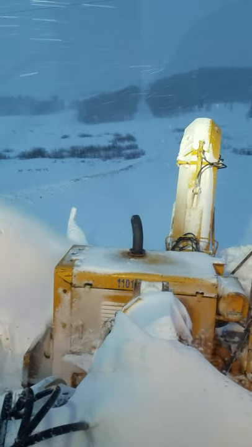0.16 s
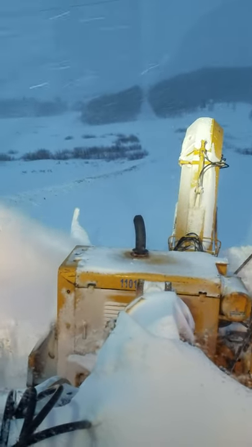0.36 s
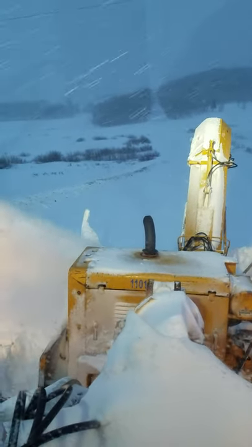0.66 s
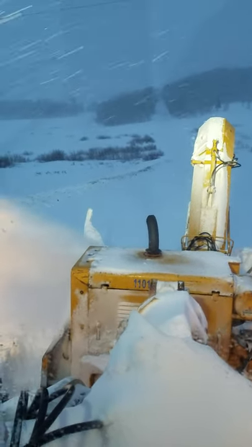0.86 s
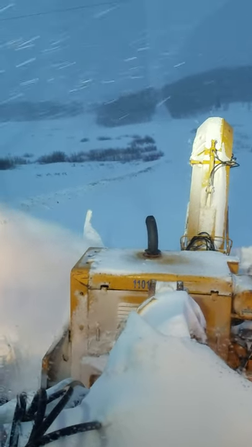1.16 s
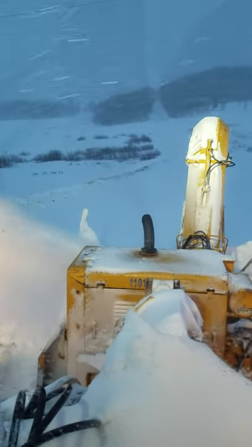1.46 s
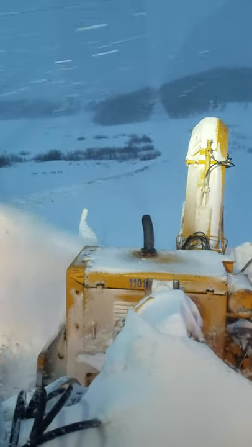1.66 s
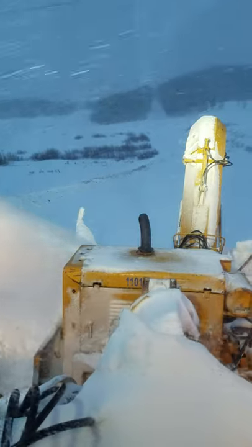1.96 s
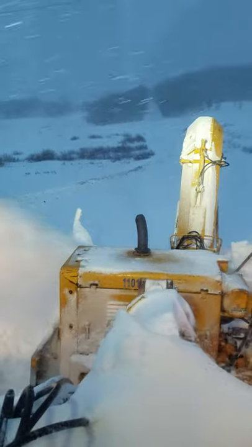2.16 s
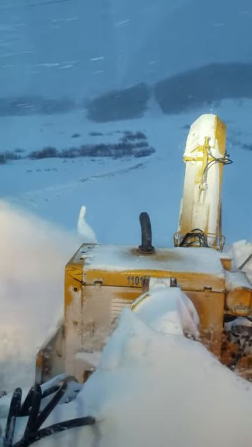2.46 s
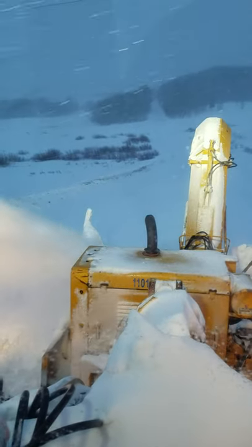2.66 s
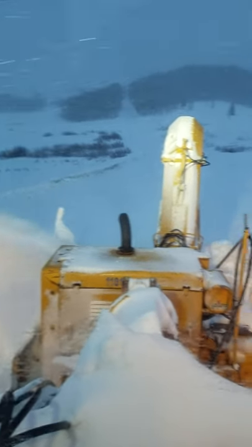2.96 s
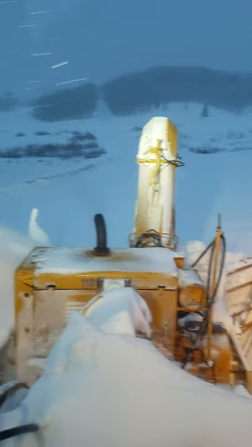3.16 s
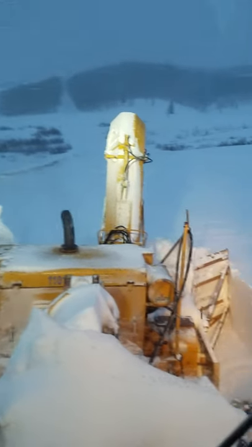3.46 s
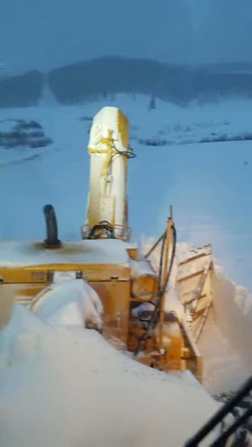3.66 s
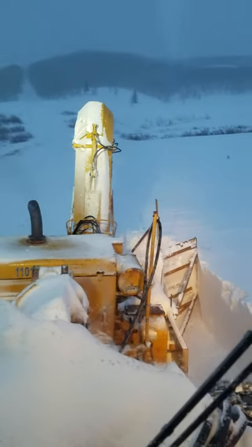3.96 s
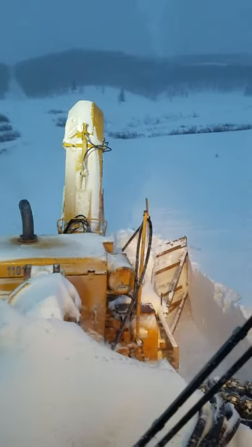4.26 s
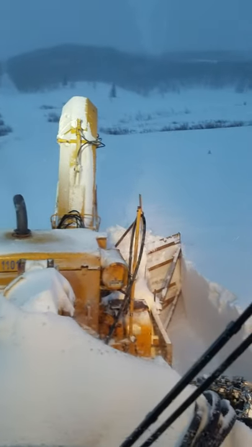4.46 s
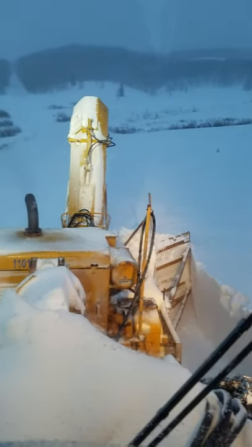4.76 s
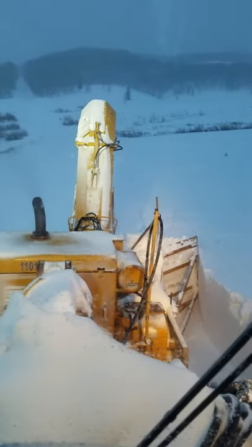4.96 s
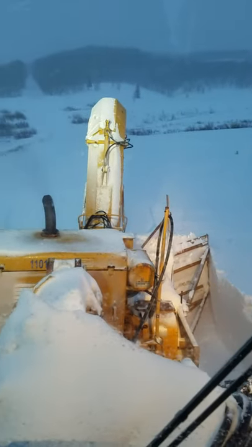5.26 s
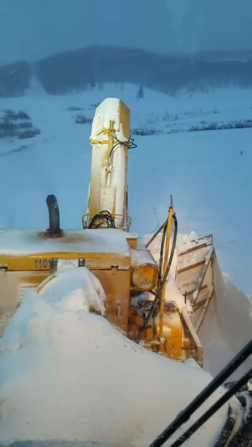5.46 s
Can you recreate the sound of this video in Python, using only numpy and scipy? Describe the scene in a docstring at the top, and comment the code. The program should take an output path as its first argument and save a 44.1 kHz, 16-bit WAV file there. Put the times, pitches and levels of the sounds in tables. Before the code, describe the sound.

A loader's diesel and a snowblower's engine and rotor run together under load, making a constant deep drone with fast clatter, ticks and a light hiss. The cab booms and the hydraulics hum, while small, bright metal pings come now and then. The microphone, inside the cab, swings once near the middle, shifting the tone a little, and the engines sag very slightly toward the end. The sound is clearer on the left.

```python
"""A wheel loader's six-cylinder diesel drones and clatters, heard in the cab as it pushes a snowblower
through deep snow. Each firing knocks and ticks, and the rattle nearly repeats every engine cycle.
Ahead, the blower's own diesel and geared rotor hum and sag under the snow. The frame rumbles, the cab
booms, the hydraulics hum and short metallic pings ring out. The microphone swings to the right once;
its right port is half covered, so that side is late, dull and quiet."""
import sys
import numpy as np
from scipy import signal
from scipy.fft import rfft, irfft, next_fast_len
from scipy.io import wavfile
from scipy.ndimage import uniform_filter1d

SR = 44100
rng = np.random.default_rng(int(sys.argv[2]) if len(sys.argv) > 2 else 0)


def int16_out(signal):
    """Quantize to a 16-bit WAV file."""
    q = np.round(np.clip(np.atleast_2d(signal).T, -1, 1) * 32767)
    wavfile.write(sys.argv[1], SR, q.astype(np.int16))


N = 246959
T = np.arange(N) / SR
SIZE = next_fast_len(N + 8192)
HZ = np.fft.rfftfreq(SIZE, 1 / SR)

# The loader's engine speed and drone: t/s, cycle rate/Hz, firing tone level/dB
LOADER_RUN = [(0.0, 10.048, -26), (0.51, 10.048, -25.2), (1.2, 9.975, -25.3), (1.9, 9.96, -25.8),
              (2.15, 10.02, -26), (3.05, 10.02, -26.5), (4.58, 9.956, -23.8), (5.09, 9.917, -24.2),
              (5.6, 9.876, -32)]
# Level changes of the loader's sound: t/s, clatter gain/dB, tick gain/dB, whine band gain/dB
LEVELS = [(0, -.5, 2, .5), (1.8, 0, 3, 0), (2.2, -.5, 3, -1.5), (3, -0.5, 3.5, -2.5), (3.7, -1, 3.5, -1),
          (4.4, -0.5, 6, .5), (5.1, 0, 4, -2), (5.6, -2, -1, -1)]


def amp(db):
    """Decibels to gain."""
    return 10 ** (np.asarray(db) / 20)


def curves(rows):
    """One smoothed automation curve for each value column of a time table."""
    times, *columns = np.transpose(rows)
    return [uniform_filter1d(np.interp(T, times, column), size=3000) for column in columns]


def per_bin(points, column=1):
    """One column of a frequency table at every FFT bin."""
    columns = np.transpose(points)
    return np.interp(np.log(HZ + 1), np.log(columns[0] + 1), columns[column])


def equalise(x, gain):
    """Filters with one gain per FFT bin."""
    return irfft(rfft(x, SIZE) * gain, SIZE)[..., :N]


def colour(noise, points):
    """Gives unit white noise the table's density, falling 60 dB an octave beyond its ends."""
    octaves_below = np.maximum(np.log2(points[0][0] / (HZ + 1)), 0)
    octaves_above = np.maximum(np.log2((HZ + 1) / points[-1][0]), 0)
    return equalise(noise, amp(per_bin(points) - 60 * (octaves_below + octaves_above)) * np.sqrt(SR / 2))


def padded(x):
    """Mirrors both ends so that filters run in and out smoothly."""
    return np.pad(x, 4096, "reflect")


def wander(hz):
    """Slow random drift of unit spread, in the decade below hz."""
    rates, phases = np.geomspace(hz / 10, hz, num=12)[:, None], rng.random((12, 1))
    drift = (np.sin(2 * np.pi * (rates * T[::64] + phases)) / np.sqrt(rates)).sum(0)
    return np.interp(T, T[::64], drift / drift.std())


def tone(turns, db, waver_db):
    """A sine whose rms level wavers around db."""
    return np.sqrt(2) * amp(db + waver_db * wander(5)) * np.sin(2 * np.pi * (turns + rng.random()))


def heading(mid_s=3.05, span_s=0.33):
    """The microphone's swing: 0 facing ahead, 1 turned right."""
    return .5 + .5 * np.tanh((T - mid_s) / span_s)


def air_hiss():
    """A thin, fluttering bed of air and microphone hiss."""
    # Hiss spectrum: f/Hz, density/(dB per Hz)
    spectrum = [(6500, -88), (7150, -79), (8500, -90.5), (10300, -105.7), (12000, -99.4), (14000, -91.5),
                (15700, -93.5)]
    return colour(rng.standard_normal(N) * amp(.7 * wander(14)), spectrum)


def cab_boom():
    """Frame and snow shake, and the cab's air and panels resonate."""
    # Cab resonances: f/Hz, width/Hz, level/dB
    modes = [(39.1, 3.6, -27.5), (119, 9, -25), (161.7, 5.6, -20), (43.8, 3.6, -32), (111.74, 1.6, -27),
             (139, 12, -30), (153.9, 4.6, -31), (421.4, 17, -43.5), (768, 26, -39)]
    # Frame and snow rumble: f/Hz, density/(dB per Hz)
    rumble = [(3, -59), (23, -50), (29, -37.5), (40, -32.5), (52, -51), (75, -56), (100, -44), (118, -38.5),
              (135, -41.5), (162, -38.5), (175, -42), (195, -47.5), (210, -43), (235, -57), (270, -59)]
    power = sum(2 * amp(db) ** 2 * SR / (np.pi * width) / (1 + (2 * (HZ - hz) / width) ** 2) ** 2
                for hz, width, db in modes)
    boom = equalise(rng.standard_normal(N), np.sqrt(power))
    return boom + colour(rng.standard_normal(N), rumble)


def hydraulic_pump():
    """The pump hums at a steady pitch."""
    # Pump harmonics: f/Hz, level/dB
    harmonics = [(101.9, -46), (203.8, -32.5), (305.7, -42.5)]
    return sum(tone(hz * T, db, waver_db=3.0) for hz, db in harmonics)


def pings(attack_s=0.0029, t60_s=0.096):
    """Short, bright pings: loose metal, and one loud injector tick at 3.38 s."""
    # Strikes: t/s, level before the attack ramp/dB, f/Hz
    strikes = [(0.0712, -34, 3720), (0.1855, -27, 3660), (0.2608, -35, 3670), (0.39, -31, 3720),
               (0.4449, -23, 3590), (0.7033, -29, 3780), (1.4687, -31, 3660), (3.3842, -30, 4930),
               (3.6516, -31, 5100), (5.1634, -27, 4904)]
    out, t = np.zeros(N + 2000), np.arange(2000) / SR
    for start, db, hz in strikes:
        envelope = amp(db - 60 * t / t60_s) * (1 - np.exp(-t / attack_s))
        out[round(start * SR):][:2000] += envelope * np.sin(2 * np.pi * hz * t)
    return out[:N]


def snowblower(nominal_hz=91.5, rotor_beats_per_firing=.362):
    """The blower's diesel and geared rotor hum; both weaken as the snow drags their speed down."""
    # Blower engine speed: t/s, firing rate/Hz
    speed = [(0, 91.9), (1.4, 91.9), (2.25, 92.6), (2.9, 91.6), (4, 91), (5.6, 89.7)]
    firing_hz, = curves(speed)
    firings, turned = np.cumsum(firing_hz) / SR, heading()
    engine_db = -16.5 + .5 * (firing_hz - nominal_hz)
    engine = tone(firings, engine_db, waver_db=0.47)
    engine += tone(2 * firings, engine_db - 12 + 2.6 * turned, waver_db=1.3)
    engine += tone(firings / 2, engine_db - 17, waver_db=3.2)
    beats = rotor_beats_per_firing * firings
    rotor_db = -15 + 1.06 * (firing_hz - nominal_hz)
    rotor = tone(beats, rotor_db, waver_db=1.86)
    rotor += tone(2 * beats, rotor_db - 19.5 + 4 * turned, waver_db=2.0)
    return engine + rotor


def through_panels(x):
    """The cab panels colour the clatter, cross-fading as the microphone turns."""
    # Panel EQ bells: f/Hz, width/Hz, gain facing ahead/dB, gain turned right/dB
    bells = [(734, 190, -1.5, 3), (1140, 55, 1, 4.5), (1460, 83, 0, 4.5), (1537, 82, 3, -1),
             (2010, 140, 1, 2), (2210, 25, 5, -7), (2620, 86, 1.5, 8.5), (2950, 86, 0.5, 7),
             (3286, 103, 5.5, 5), (3660, 100, 6.5, 0.5), (4050, 130, 0, 1), (4450, 100, 2, 2.5),
             (6140, 200, -0.5, 1.5), (7300, 190, 0.5, 0), (8400, 500, -2.5, 1.5)]
    ahead_db = right_db = 0
    for hz, width, ahead, right in bells:
        bell = 1 / (1 + (2 * (HZ - hz) / width) ** 2)
        ahead_db += ahead * bell
        right_db += right * bell
    turned = heading()
    return (1 - turned) * equalise(x, amp(ahead_db)) + turned * equalise(x, amp(right_db))


def bursts(cycle, accents_db, offset_cycles, decay_firings, floor, spread_db):
    """Unit-power envelope: one dying burst per firing over a steady floor, no two alike."""
    firing = 6 * (cycle - offset_cycles)
    index, age = np.floor(firing).astype(int), firing % 1
    strength = amp(accents_db[index % 6] + spread_db * rng.standard_normal(400)[index])
    envelope = strength * (1 - np.exp(-age / 0.07)) * np.exp(-age / decay_firings) + floor
    return envelope / np.sqrt(np.mean(envelope ** 2))


def injector_ticks(cycle, accents_db, ring_hz=4950, half_width_hz=230):
    """An engine cover rings under the ticking injectors."""
    ticks = rng.standard_normal(N)
    ticks *= bursts(cycle, accents_db, offset_cycles=.96, decay_firings=.7, floor=.11, spread_db=2.5)
    ticks *= amp(1.1 * wander(7))
    cover = amp(-46.5) / np.sqrt(np.pi * 500 / SR) / (1 + ((HZ - ring_hz) / half_width_hz) ** 2)
    return equalise(ticks, cover)


def valve_hiss(cycle, rattle, accents_db, rattle_share=.26):
    """The valve gear hisses, pulsing lightly with the firings."""
    # Valve gear spectrum: f/Hz, density/(dB per Hz)
    spectrum = [(2200, -71), (2450, -69.5), (2900, -64.5), (3400, -69.5), (4400, -72.5), (5000, -76),
                (5700, -84.5), (6300, -88)]
    hiss = np.sqrt(rattle_share) * rattle + np.sqrt(1 - rattle_share) * rng.standard_normal(N)
    hiss *= amp(1.4 * wander(8) + 0.23 * wander(2.8))
    hiss *= bursts(cycle, accents_db, offset_cycles=.15, decay_firings=1, floor=3.6, spread_db=5.5)
    return colour(hiss, spectrum)


def diesel_knock(cycle, rattle, accents_db, rattle_share=.52):
    """Each firing knocks out a burst of rattle over a wavering roar."""
    # Midrange clatter spectrum: f/Hz, density/(dB per Hz)
    spectrum = [(240, -63), (300, -55.5), (420, -49), (480, -53.5), (550, -56), (650, -52.5), (790, -48.5),
                (880, -55), (1120, -54), (1250, -53.5), (1300, -52), (1650, -55), (1720, -57),
                (2300, -59.5)]
    knocks = bursts(cycle, accents_db, offset_cycles=.97, decay_firings=.32, floor=.51, spread_db=3.5)
    roar = rng.standard_normal(N) * amp(0.93 * wander(12))
    return colour(np.sqrt(rattle_share) * rattle * knocks + np.sqrt(1 - rattle_share) * roar, spectrum)


def loader_clatter(cycle, memory=0.857):
    """Knock, valves, ticks and air. Each cycle's rattle echoes the last, combing it at the cycle rate."""
    # Cylinder accents in firing order: knock/dB, tick/dB
    cylinders = [(-9.5, 6.5), (0, 0), (-3, -3.5), (4, -1.5), (-0.5, -3), (2, -0.5)]
    knock_db, tick_db = np.transpose(cylinders)
    clatter_gain_db, tick_gain_db, _ = curves(LEVELS)
    steps = 4410  # noise samples per engine cycle
    noise = rng.standard_normal((80, steps))
    cycles = signal.lfilter([np.sqrt(1 - memory ** 2)], [1, -memory], noise, axis=0)
    rattle = cycles[20:].ravel()[(cycle * steps).astype(int)]  # settled after 20 cycles
    clatter = diesel_knock(cycle, rattle, knock_db) + valve_hiss(cycle, rattle, knock_db)
    ticks = injector_ticks(cycle, tick_db)
    return amp(clatter_gain_db) * through_panels(clatter + air_hiss()) + amp(tick_gain_db) * ticks


def loader_drone(cycle, firing_db):
    """Six firings a cycle make the drone; the engine orders shift balance as the microphone turns."""
    # Engine orders: f/cycle rate
    orders = [4, 7, 8, 10, 12, 19, 28, 34, 38, 43, 49, 53, 61, 66, 78, 80, 81, 87, 93, 98, 105, 106, 113,
              114, 129, 131, 141, 146, 148, 156, 164, 175, 194]
    # One row per order: level facing ahead/dB, level turned right/dB
    order_levels = [(-28, -25), (-46, -40.5), (-39, -36.5), (-41, -30), (-31.5, -28.5), (-36, -38),
                    (-46.5, -47.5), (-45, -42.5), (-44.5, -53.5), (-45.5, -43.5), (-42, -47),
                    (-47.5, -41.5), (-42.5, -55.5), (-40, -38.5), (-33, -32), (-34.5, -39.5), (-35, -43),
                    (-47, -42), (-46.5, -41), (-50, -43.5), (-55.5, -49), (-47, -44.5), (-46.5, -41),
                    (-42, -38), (-38, -39), (-44, -40), (-37.5, -40), (-42.5, -50.5), (-41.5, -41),
                    (-34.5, -42), (-40.5, -44), (-48, -60), (-40.5, -43)]
    turned = heading()
    drone = tone(6 * cycle, firing_db, waver_db=-2.1)
    for order, (ahead, right) in zip(orders, order_levels):
        drone += tone(order * cycle, ahead + (right - ahead) * turned, waver_db=1.56)
    return drone


def ride_whine(mix, centre_hz=760, width_hz=190):
    """The band of the strongest whine swells and eases."""
    _, _, gain_db = curves(LEVELS)
    band = equalise(mix, 1 / (1 + (2 * (HZ - centre_hz) / width_hz) ** 4))
    return mix + (amp(gain_db) - 1) * band


def covered_port(tones, left_noise, other_noise):
    """The half-covered right port hears the cab late and muffled, its noise partly by other paths."""
    # Right port against left: f/Hz, gain/dB, noise coherence/(0-1)
    response = [(30, -1.3, 0.83), (60.7, -0.5, 1), (120, -6.5, 1), (180.7, -6, 0.74), (200, -14, 0.26),
                (300, -3, .86), (430, -13.5, 0.8), (800, -12, 0.4), (1200, -13, 0.5), (1800, -17.5, 0),
                (4000, -20.5, 0.2), (5000, -15, 0.3), (6000, -7, 0.5), (7200, -20, .2), (10200, 5.5, 0.3),
                (14000, 1, .2)]
    # Right port behind left: f/Hz, phase lag/rad
    lag = [(0, 0), (30, .33), (60, .5), (170, .8), (800, .8), (1800, 2.)]
    coherence = np.clip(per_bin(response, column=2), 0, 1)
    paths = (1, tones), (coherence, left_noise), (np.sqrt(1 - coherence ** 2), other_noise)
    spectrum = sum(weight * rfft(padded(x), SIZE) for weight, x in paths)
    spectrum *= amp(per_bin(response)) * np.exp(-1j * per_bin(lag))
    return irfft(spectrum, SIZE)[4096:][:N]


def scene():
    """The cab mix: open on the left, through the covered port on the right."""
    cycle_hz, firing_db = curves(LOADER_RUN)
    cycle = .082 + np.cumsum(cycle_hz) / SR  # running count of the loader's engine cycles
    tones = loader_drone(cycle, firing_db) + snowblower() + hydraulic_pump() + pings()
    left_noise = loader_clatter(cycle) + cab_boom()
    other_noise = loader_clatter(cycle) + cab_boom()
    return ride_whine(np.array([tones + left_noise, covered_port(tones, left_noise, other_noise)]))


def record(dry, knee=.65, headroom=.35, cutoff_hz=15770, fade_s=.004):
    """Soft-clips the loudest peaks, cuts the top end and fades in."""
    over = np.maximum(abs(dry) - knee, 0)
    clipped = dry - np.sign(dry) * (over - headroom * np.tanh(over / headroom))
    lowpass = signal.firwin(2047, cutoff_hz, window=("kaiser", 9), fs=SR)
    fade_in = np.sin(np.pi / 2 * np.minimum(T / fade_s, 1)) ** 2
    return fade_in * np.array([signal.oaconvolve(padded(x), lowpass, "same")[4096:][:N] for x in clipped])


dry = scene()
out = record(dry)
int16_out(out)
```